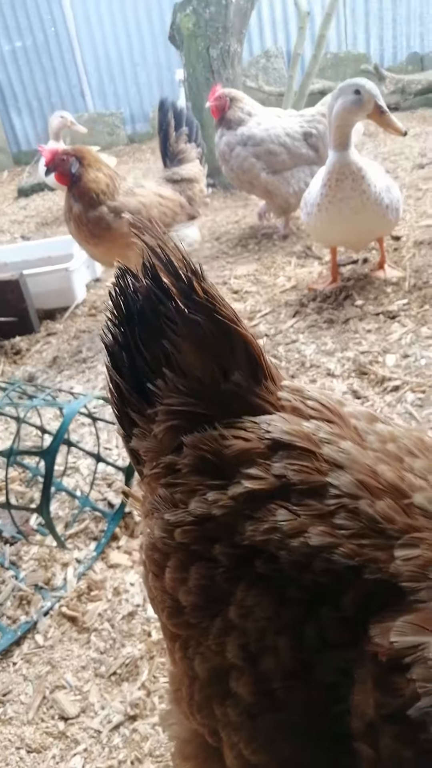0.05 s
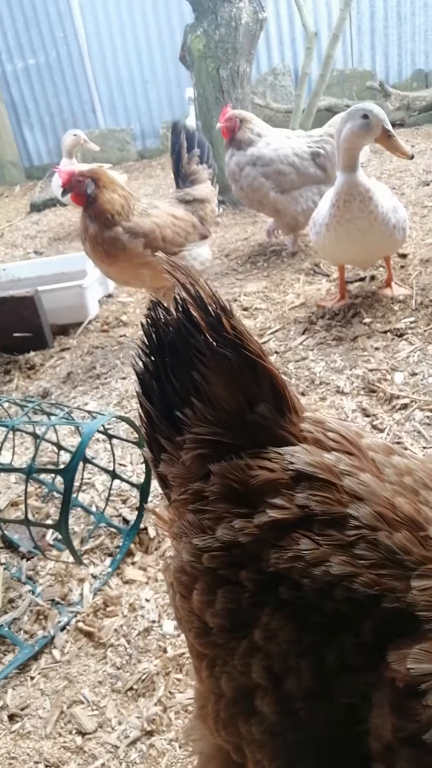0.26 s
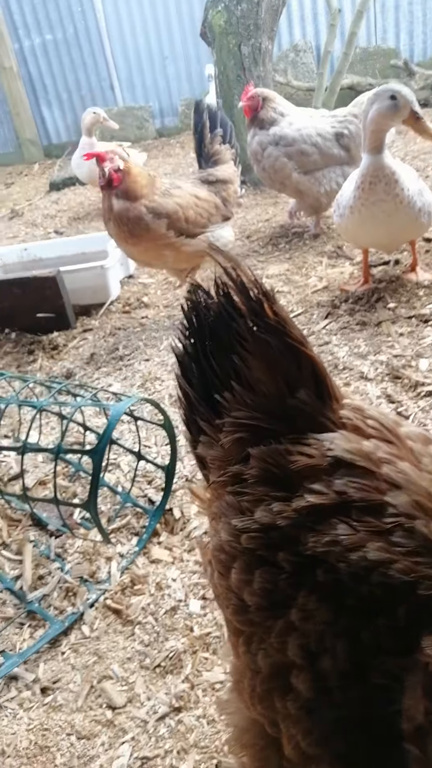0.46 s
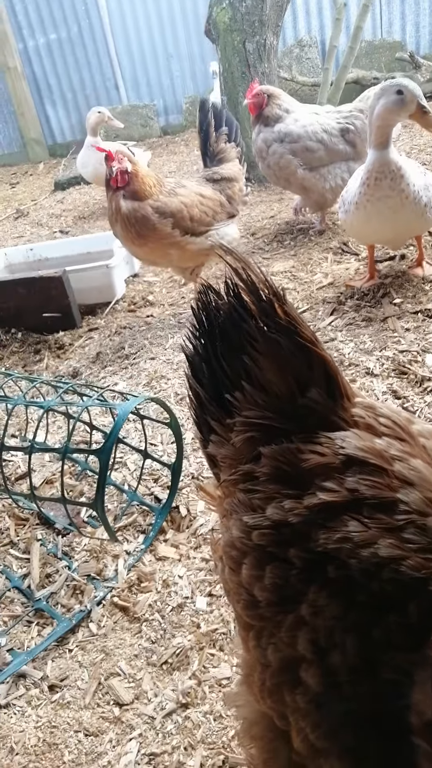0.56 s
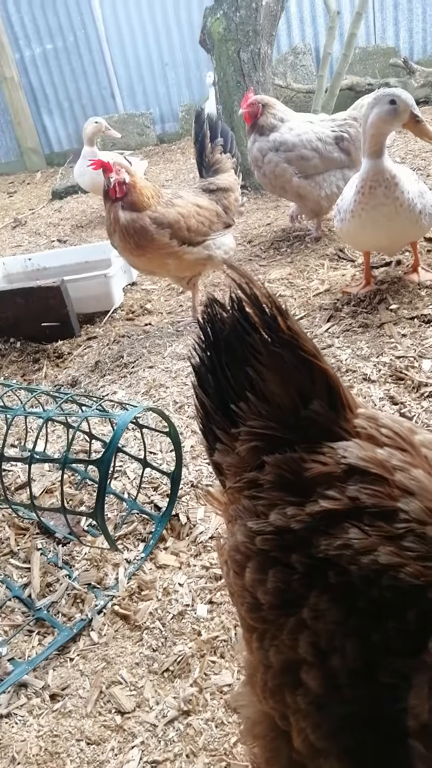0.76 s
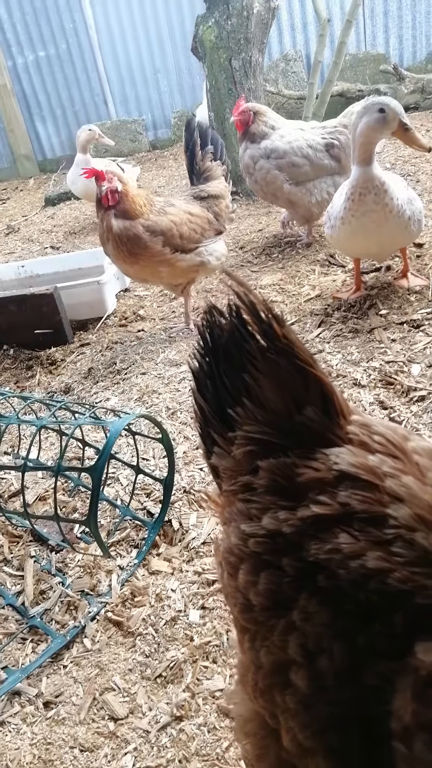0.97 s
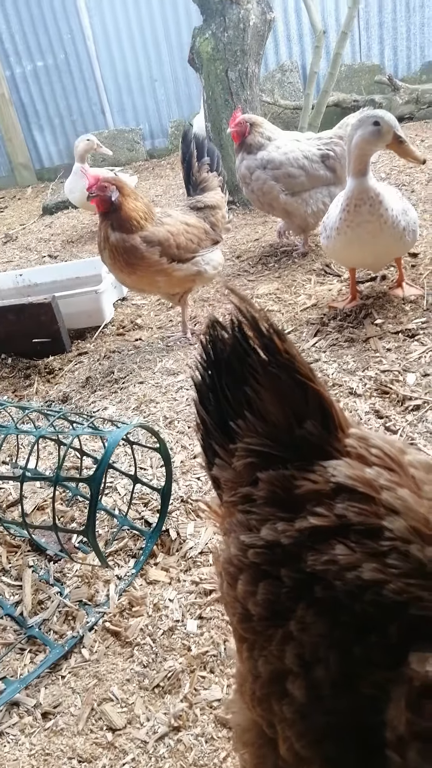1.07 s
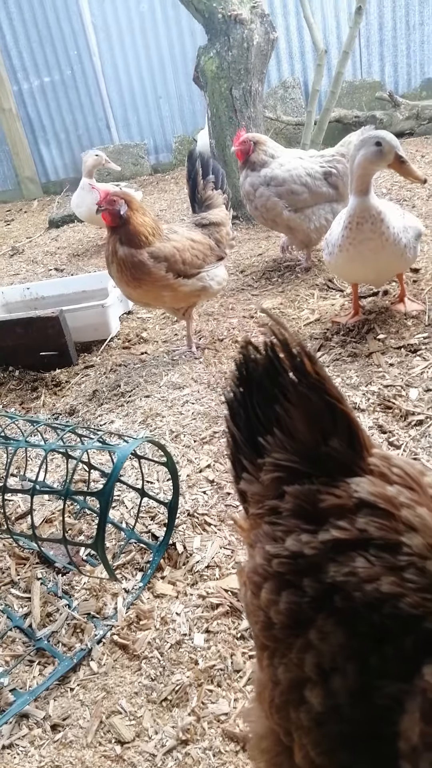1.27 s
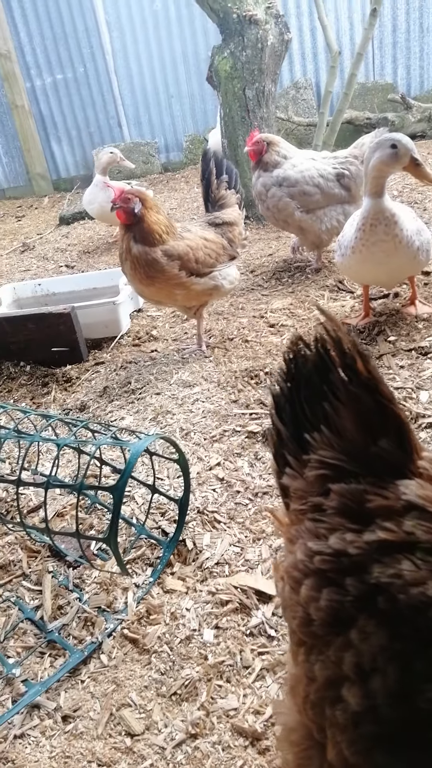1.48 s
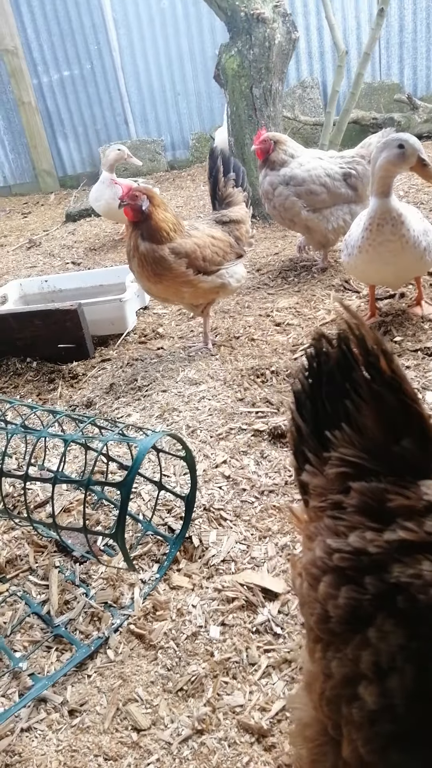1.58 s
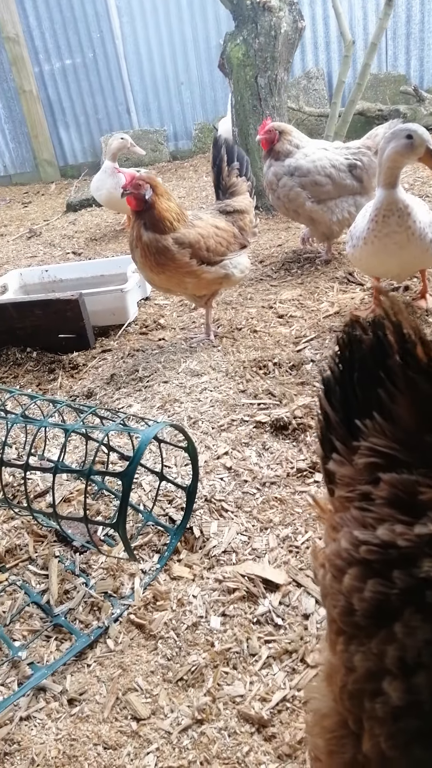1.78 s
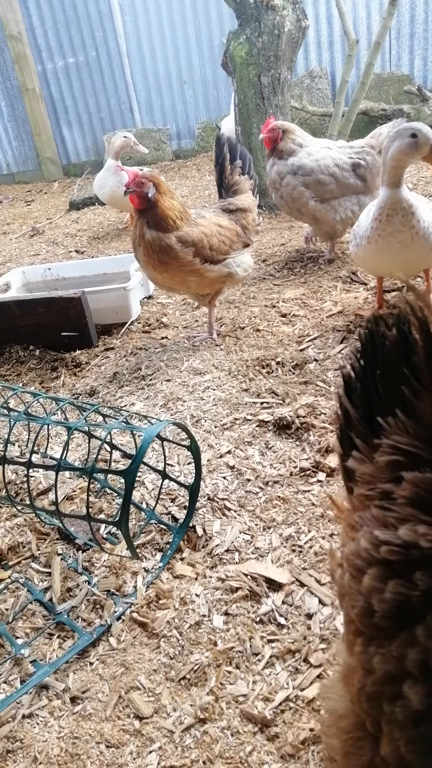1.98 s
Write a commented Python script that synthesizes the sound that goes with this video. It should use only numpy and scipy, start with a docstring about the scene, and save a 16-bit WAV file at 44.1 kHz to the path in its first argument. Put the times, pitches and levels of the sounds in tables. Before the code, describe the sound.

A hen, close and slightly left, gives a long, cracking whine from the start until about 0.7 seconds. Distant birds chirp harshly but faintly from 0.7 to 1 second. The hen moans, lower and hoarse, from 0.9 to 1.5, adds a short moan straight after, and a softer one near 2 seconds. Straw snaps faintly around 0.9 and 1.6 seconds, over a quiet outdoor rumble.

```python
"""A hen, close by in a backyard pen, gives a long, cracking whine, then lower, hoarse moans.
Her syrinx pulses and breath rasp are shaped by throat and beak. Farther off, birds chirp harshly
in shaking glides; straw snaps faintly underfoot. Ground, metal fence and yard answer the calls,
over a faint outdoor rumble."""
import sys
import numpy as np
from scipy import signal
from scipy.fft import rfft, irfft, next_fast_len
from scipy.io import wavfile
from scipy.ndimage import map_coordinates

SR = 44100
rng = np.random.default_rng(int(sys.argv[2]) if len(sys.argv) > 2 else 0)


def wav_record(signal):
    """Record a signal, one row per channel, as 16-bit PCM in the file named by sys.argv[1]."""
    frames = np.transpose(np.atleast_2d(signal))
    bounded = np.clip(frames, -1, 1)
    # unit amplitude maps onto the largest positive 16-bit level
    quanta = np.round(bounded * 32767).astype(np.int16)
    wavfile.write(sys.argv[1], SR, quanta)


N = 90052

# hen's calls, one table per moan: t/s, f/Hz, level/dB, roughness, treble/dB
WHINE_CALL = [(0, 627, -27.5, 0.01, 7), (.03, 623.1, -40, 0.04, 12.5), (.04, 634, -22.5, 0.41, -1.5),
              (.085, 635.2, -27, 0.4, 0.5), (.125, 637.1, -25, 0.08, -1), (.172, 634.6, -31, 1.03, 3.5),
              (.2, 637.7, -25, 0.41, -2), (.255, 634.2, -24.5, 0.8, 0), (.29, 631.2, -25.5, 0.28, 0),
              (.315, 625.2, -32.5, 0.33, 8.5), (.36, 636, -26, 0.78, 1), (.415, 636, -26.5, 0.77, -2),
              (.458, 622.3, -32, 0.13, 8), (.485, 632.5, -24, .25, 0.5), (.52, 629.8, -29, 0.83, 2.5),
              (.56, 623.2, -26, 0.16, 0.5), (.6, 619.5, -27, 0.16, 3), (.618, 591.2, -31, .45, 0.5),
              (.655, 585.4, -46.5, 0.7, 1.5)]
MOAN_CALLS = [
    [(.932, 545, -47.5, 1, -7), (.948, 554.8, -37, 0.804, -5), (1.05, 590.3, -35, 0.84, 2.5),
     (1.14, 582, -32.5, 0.3, -1), (1.19, 584.5, -34.5, 0.74, 3), (1.235, 588.6, -32, .3, -0.5),
     (1.32, 579.1, -34.5, 0.5, 2), (1.41, 563.1, -35.5, 0.79, 0), (1.475, 558, -46, 0.83, -6)],
    [(1.483, 560.7, -43, 0.99, -3), (1.488, 568.7, -32.5, .75, -3.5), (1.525, 575.4, -35, .7, -0.5),
     (1.542, 581.1, -30, .4, -2), (1.575, 560.5, -39.5, 0.772, -1), (1.61, 561, -50, 0.61, -2.5)],
    [(1.905, 594, -61, 0.506, -16), (1.917, 591, -44, 0.51, -7.5), (1.962, 581.8, -44, 0.77, -3.5),
     (1.99, 595, -36.5, 0.42, -3.5), (2.05, 584.4, -34.5, .55, -8)],
]
# throat and beak response to pulses and to rasp: f/Hz, level/dB
WHINE_THROAT = [(300, -37.5), (630, -22.5), (850, -27.5), (1100, -2.5), (1270, -2.5), (1400, 19),
                (1600, -18), (1900, -12.5), (2550, -10.5), (3150, -23), (3800, -28.5), (4400, -38),
                (5600, -27.5), (7200, -32.5), (8500, -48.5), (11500, -47), (14500, -66)]
CRACK_THROAT = [(200, -30.5), (350, -21), (680, -25), (850, -15.5), (1040, -9.5), (1350, 1), (1700, -13),
                (2050, -17.5), (2700, -6), (3400, -21), (4400, -32), (5700, -27), (7300, -28.5),
                (8500, -47.5), (11500, -42.5), (14500, -58.5)]
WHINE_RASP = [(150, -22.5), (380, -13), (500, -23), (820, -16), (1100, -11.5), (1450, 0), (1700, -9),
              (2750, 5), (3500, -15), (4500, -21.5), (5700, -14.5), (7400, -16.5), (8500, -28.5),
              (9300, -21.5), (12000, -34.5), (14500, -46.5)]
MOAN_THROAT = [(300, -47), (580, -17.5), (850, -23.5), (1170, 2), (1500, -12.5), (1760, -7.5), (2320, -1.5),
               (2900, -9.5), (3300, -20), (3900, -33), (5900, -24.5), (7300, -27), (8400, -41.5),
               (11800, -39.5), (14500, -59)]
MOAN_RASP = [(200, -40.5), (450, -19.5), (680, -3), (850, -6.5), (1150, 11), (1650, -4), (2200, 0.5),
             (2850, 4.5), (3300, -45), (3900, -30.5), (4900, -24.5), (5900, -10.5), (7400, -25.5),
             (8400, -38), (10000, -41), (12000, -29.5), (14500, -53)]
# hen, left over right: f/Hz, level/dB
HEN_BALANCE = [(300, 4.5), (680, -4), (1200, 2), (1900, 4), (3200, 3), (5500, 6), (8700, 0), (13000, -7)]
# hen, left ahead of right: f/Hz, phase/rad
HEN_LEAD = [(10, -15), (600, 3), (1200, 5.5), (1400, 7), (1900, 7), (2500, 10), (3200, 11.5), (4300, 16.5),
            (7000, 23.5), (14000, 50)]
# yard decay: f/Hz, T60/s
YARD_T60 = [(200, 0.18), (1300, 0.41), (3000, 0.38), (6000, 0.28), (12000, 0.28)]
# outdoor noise: f/Hz, level/dB
AIR_SPECTRUM = [(20, -3.5), (45, -0.5), (90, -4.5), (140, -14.5), (300, -24), (600, -30.5), (2000, -30.5),
                (5000, -39), (8000, -48), (14000, -49.5)]
# outdoor noise: f/Hz, left-right correlation
AIR_COHERENCE = [(50, 1), (130, 1), (400, 0.2), (2000, .2)]
# far birds: t/s, length/s, start f/Hz, end f/Hz, level/dB
CHIRP_GLIDES = [(0.672, 0.03, 1900, 2170, -49.5), (0.689, 0.054, 3400, 2606, -54),
                (.69, 0.02, 4400, 4230, -59.5), (0.769, 0.052, 2150, 2482, -52.5),
                (0.791, .05, 5500, 4700, -55), (0.805, 0.059, 3800, 2685, -46),
                (0.826, 0.021, 1950, 1757, -48), (0.868, 0.053, 5600, 5050, -58),
                (0.892, 0.035, 3600, 3193, -47.5), (0.905, 0.023, 1700, 1855, -46),
                (0.931, .05, 4400, 3960, -52), (0.966, .055, 5300, 5140, -48),
                (.975, 0.058, 4000, 3375, -41.5), (1.86, 0.028, 2100, 2620, -57),
                (1.879, 0.03, 3200, 2920, -64)]
# straw snaps: t/s, level/dB
SNAPS = [(.94, -52), (1.593, -47.5)]
# noise spectra: f/Hz, level/dB
HISS_DB, HISS = -13, [(500, -14), (1500, -2.5), (3000, 5), (5500, -5.5), (7000, -19.5), (12000, -23)]
SNAP_T60_S, SNAP_SPECTRUM = .008, [(500, -15), (3000, -4), (10000, -3), (14000, -8.5)]


def amp(db):
    """dB to gain."""
    return 10 ** (np.asarray(db) / 20)


def unit(x):
    """x at rms 1."""
    return x / np.sqrt(np.mean(x ** 2) + 1e-20)


def along(points, hz):
    """(f/Hz, value) points, interpolated on a log axis."""
    f, v = np.transpose(points)
    return np.interp(np.log(hz + 1), np.log(f + 1), v)


def wobble(rate_hz):
    """Smooth random curve, knots at rate_hz."""
    return map_coordinates(rng.standard_normal(N // 8), [np.arange(N) * rate_hz / SR], mode="wrap")


def filtered(x, response):
    """x through response(hz)."""
    size = next_fast_len(N + SR // 4)
    return irfft(rfft(x, size) * response(np.fft.rfftfreq(size, 1 / SR)), size)[..., :N]


def coloured(x, spectrum):
    """x through an (f/Hz, level/dB) spectrum, at rms 1."""
    return unit(filtered(x, lambda hz: amp(along(spectrum, hz))))


def phase_rad(hz):
    """Running phase."""
    return 2 * np.pi * np.cumsum(hz) / SR


def brighten(sound, treble_db, corner_hz=1672):
    """Time-varying treble shelf."""
    treble = filtered(sound, lambda hz: 1 - 1 / (1 + (hz / corner_hz) ** 10))
    return sound + treble * (amp(treble_db) - 1)


def controls(call):
    """Pitch, gain, roughness, treble per sample; gain 0 outside the call."""
    t = np.arange(N) / SR
    knots_s, *columns = np.transpose(call)
    pitch_hz, level_db, rough, treble_db = (np.interp(t, knots_s, c) for c in columns)
    gain = amp(level_db) * ((t >= knots_s[0]) & (t <= knots_s[-1]))
    return pitch_hz, gain, np.clip(rough, .01, 1), treble_db


def syrinx(pitch_hz, doubling):
    """Pulse train; doubling alternates strong and weak pulses."""
    phase = phase_rad(pitch_hz)
    pulses = sum(np.cos(k * phase) for k in range(1, 26))
    return pulses * (1 + doubling * np.cos(phase / 2))


def rasp(pitch_hz, spectrum):
    """Turbulence, let through once a cycle."""
    return coloured(rng.standard_normal(N) * (1 + 0.9 * np.cos(phase_rad(pitch_hz))), spectrum)


def whine(crack_ratio=1.07, crack_db=-1.5, crack_jitter=0.0407, waver=0.01987, lurch_db=3):
    """Hen's clean tone; in cracks, a higher, period-doubled oscillation takes turns with it."""
    pitch_hz, gain, rough, treble_db = controls(WHINE_CALL)
    clean_hz = pitch_hz * (1 + 0.0034 * wobble(70.36) + waver * rough * wobble(240))
    clean = coloured(syrinx(clean_hz, doubling=0), WHINE_THROAT)
    crack_hz = pitch_hz * crack_ratio * (1 + np.sqrt(rough) * crack_jitter * wobble(200))
    cracked = coloured(syrinx(crack_hz, doubling=0.63 * rough ** 2), CRACK_THROAT)
    share = np.clip(rough * (1 + 0.37 * wobble(110.3)), 0, 1)
    breath = amp(-9.5 + 13.5 * (rough - 1)) * rasp(pitch_hz, WHINE_RASP)
    sound = (1 - 0.9 * share) * clean + amp(crack_db) * share * cracked + breath
    lurch = amp(lurch_db * rough * wobble(129.63))
    return gain * lurch * brighten(sound, treble_db)


def fence(x, count=8, longest_s=.03):
    """Early echoes off ground and fence, different per channel."""
    delays_s = longest_s * rng.uniform(0.10163, 1, (count, 2, 1))
    return filtered(x, lambda hz: sum(np.exp(-2j * np.pi * hz * d) for d in delays_s) / np.sqrt(count))


def yard(x):
    """Diffuse tail; each frequency decays at its own rate."""
    hz, t, noise = signal.stft(rng.standard_normal((2, SR // 2)), SR, nperseg=256)
    decay = amp(-60 * t / along(YARD_T60, hz)[:, None])
    tail = signal.istft(noise * decay, SR, nperseg=256)[1]
    return signal.fftconvolve(x[None], tail / np.linalg.norm(tail[0]), axes=1)[:, :N]


def air(level_db=-56.5, flutter_db=2.4):
    """Near-mono outdoor rumble with a faint, wider hiss."""
    def mid_side(hz):
        width_rad = np.arccos(np.clip(along(AIR_COHERENCE, hz), -1, 1)) / 2
        return amp(along(AIR_SPECTRUM, hz)) * [np.cos(width_rad), np.sin(width_rad)]

    mid, side = filtered(rng.standard_normal((2, N)), mid_side)
    return amp(level_db + flutter_db * wobble(8.18)) * unit(np.array([mid + side, mid - side]))


def birds(jitter=.06, jitter_hz=830):
    """Harsh chirps: one gliding tone each, with shaking pitch and hiss."""
    t, out = np.arange(N) / SR, np.zeros(N)
    for start_s, length_s, start_hz, end_hz, level_db in CHIRP_GLIDES:
        progress = np.clip((t - start_s) / length_s, 0, 1)
        pitch_hz = (start_hz + (end_hz - start_hz) * progress) * (1 + jitter * wobble(jitter_hz))
        envelope = amp(level_db) * np.sqrt(8 * progress * (1 - progress))
        out += envelope * (np.sin(phase_rad(pitch_hz)) + amp(HISS_DB) * rasp(pitch_hz, HISS))
    return out


def moan(call, jitter=.075, shimmer=0.29, croak_hz=174.2, croak_depth=0.59):
    """Hen's lower, unsteady pulses and rasp, chopped by an uneven croak."""
    pitch_hz, gain, rough, treble_db = controls(call)
    croak_rad = phase_rad(croak_hz * (1 + .35 * wobble(110)))
    chop = np.exp(croak_depth * rough * np.cos(croak_rad))
    unsteady_hz = pitch_hz * (1 + 0.00302 * wobble(60) + jitter * rough ** 2 * wobble(300))
    pulses = syrinx(unsteady_hz, doubling=0.62 * rough * wobble(120))
    voiced = coloured(pulses * (1 + shimmer * rough * wobble(200)), MOAN_THROAT)
    breath = amp(1.5 + 5.5 * (rough - 1)) * rasp(pitch_hz, MOAN_RASP)
    sound = unit(chop * ((1.3 - 0.53 * rough) * voiced + breath))
    return gain * brighten(sound, treble_db)


def straw():
    """Bedding snaps underfoot: fast-decaying noise bursts."""
    t = np.arange(N) / SR
    envelope = sum(amp(level_db - 60 * np.clip((t - start_s) / SNAP_T60_S, 0, 2)) * (t >= start_s)
                   for start_s, level_db in SNAPS)
    return envelope * coloured(rng.standard_normal((2, N)), SNAP_SPECTRUM)


def scene(hen_fence_db=2, hen_yard_db=-7.5, birds_yard_db=1, birds_left_db=2.3):
    """Near hen, left of centre; far birds, by reflections only; straw and air."""
    sides = np.array([[.5], [-.5]])
    hen = whine() + sum(moan(call) for call in MOAN_CALLS)
    chirps = birds()
    direct = filtered(hen, lambda hz: np.exp(1j * sides * along(HEN_LEAD, hz)))
    near = direct + amp(hen_fence_db) * fence(hen) + amp(hen_yard_db) * yard(hen)
    near = filtered(near, lambda hz: amp(sides * along(HEN_BALANCE, hz)))
    far = amp(sides * birds_left_db) * (fence(chirps) + amp(birds_yard_db) * yard(chirps))
    return near + far + straw() + air()


def record(dry):
    """Brick-wall low-pass, 15 kHz."""
    return filtered(dry, lambda hz: hz < 15000)


dry = scene()
out = record(dry)
wav_record(out)
```